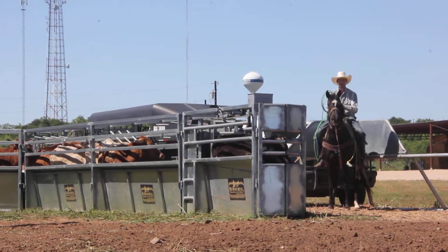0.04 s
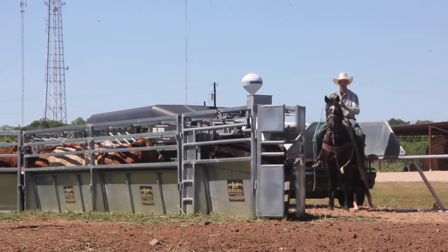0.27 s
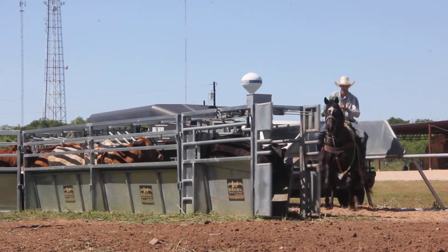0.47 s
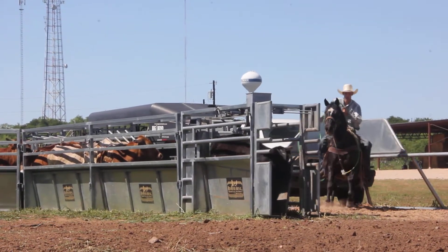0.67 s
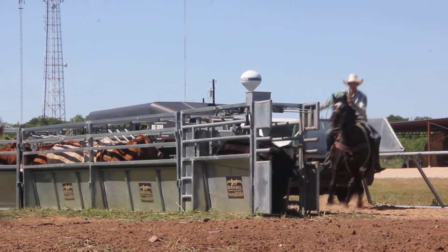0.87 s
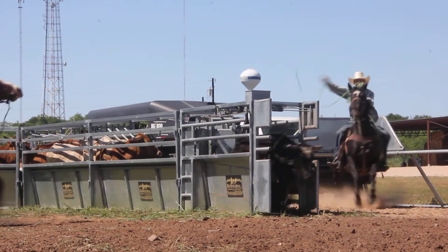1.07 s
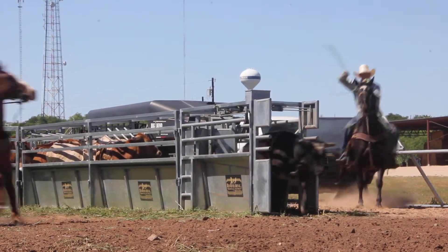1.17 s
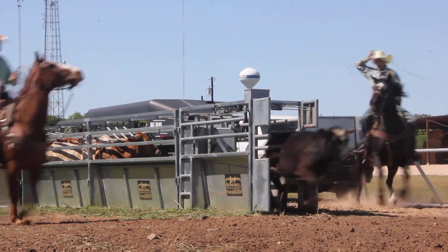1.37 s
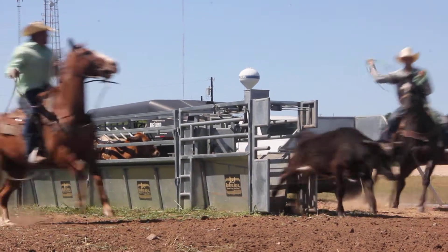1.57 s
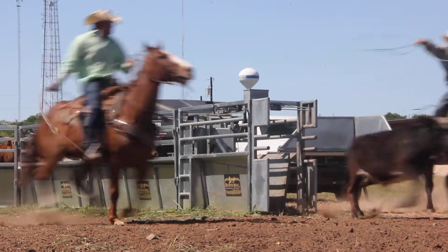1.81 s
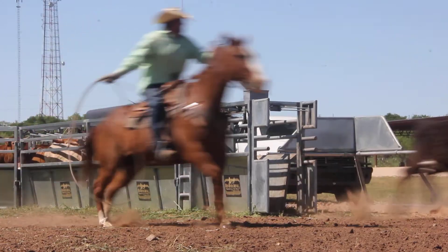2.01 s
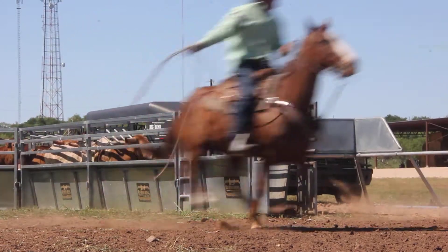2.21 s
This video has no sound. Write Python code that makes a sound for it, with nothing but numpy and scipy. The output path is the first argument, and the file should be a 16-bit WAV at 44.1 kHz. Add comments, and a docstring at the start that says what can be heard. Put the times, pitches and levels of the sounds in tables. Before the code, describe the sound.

A steel cattle gate squeals and clangs open, then bars rattle and hooves thud on dirt.

```python
"""A steel cattle chute opens in an outdoor dirt arena. The latch snaps, the dry hinges stick and slip,
squealing from one note to the next, and the gates crash against their stops and set the frame ringing.
A steer barges out, rattling the bars and thumping the panels, while horses gallop off, kicking up grit.
A short swish passes near the end, and the pens stir quietly behind it all."""
import sys
import numpy as np
from scipy import signal
from scipy.fft import rfft, irfft
from scipy.io import wavfile

SR = 44100
rng = np.random.default_rng(int(sys.argv[2]) if len(sys.argv) > 2 else 0)


def persist_wave(psi):
    """Save psi, clipped to +-1, as 16-bit WAV."""
    counts = np.round(np.clip(psi, -1, 1) * 32767).astype(np.int16)
    wavfile.write(sys.argv[1], SR, np.atleast_2d(counts).T)


N = 99225
T = np.arange(N) / SR

# Deep notes of the chute's panels: pitch_hz, level_db, fade_s (time to fall by 60 dB)
PANEL_NOTES = [(142.3, -7, 0.3), (189.4, -10.5, 0.75), (225.6, -3, 0.97), (245.3, -2.5, 1),
               (281, 1.5, 0.74), (314.7, -2, 0.38)]


def from_db(db):
    """Turn decibels into a number to multiply by."""
    return 10 ** (np.asarray(db) / 20)


def rms_one(x):
    """Scale a sound so its average power is 1."""
    return x / np.sqrt(np.mean(x ** 2) + 1e-20)


def energy_one(x):
    """Scale a sound so its total energy is 1."""
    return x / np.sqrt(np.sum(x ** 2) + 1e-20)


def loudness(points):
    """A volume curve through rows of time_s, level_db."""
    return from_db(np.interp(T, *np.transpose(points)))


def at_pitch(points, hz):
    """Read between a table's rows, giving each octave equal room."""
    pitches, values = np.transpose(points)
    return np.interp(np.log(hz), np.log(pitches), values)


def noise(tone):
    """Noise shaped by rows of pitch_hz, level_db, dropping steeply past both ends."""
    hz = np.maximum(np.fft.rfftfreq(N, 1 / SR), 1)
    edges = np.minimum(1, np.minimum(hz / tone[0][0], tone[-1][0] / hz)) ** 4
    gain = from_db(at_pitch(tone, hz)) * edges
    return rms_one(irfft(rfft(rng.standard_normal(N)) * gain, N))


def wander(rate_hz):
    """A smooth random wobble, about 1 in size."""
    r = np.exp(-2 * np.pi * rate_hz / SR)
    return rms_one(signal.lfilter([1], [1, -2 * r, r * r], rng.standard_normal(2 * N))[N:])


def fade(fade_s, t=T):
    """Die away by 60 dB every fade_s seconds."""
    return np.exp(-np.log(1000) * t / fade_s)


def clicks(per_s, spread_db):
    """Tiny taps of uneven size at random times."""
    sizes = from_db(spread_db * np.minimum(rng.exponential(1, N), 4)) * rng.choice([-1, 1], N)
    return rms_one(sizes * (rng.random(N) < per_s / SR))


def strike(force, body):
    """Every tap in the force sets off the body's own sound."""
    return signal.fftconvolve(force, body)[:N]


def ring(notes):
    """A struck object rings with several fading notes at once."""
    return energy_one(sum(from_db(db) * fade(fade_s) * np.sin(2 * np.pi * hz * T) * rng.choice([-1, 1])
                          for hz, db, fade_s in notes))


def blow(start_s, db, body):
    """Place one hit in time; its level counts the energy as if spread over 30 ms."""
    delayed = np.concatenate([np.zeros(int(start_s * SR)), body])[:N]
    return from_db(db) * np.sqrt(.03 * SR) * delayed


def pens():
    """The stir of the pens is a soft, slightly wavering noise."""
    # Tone of the stir: pitch_hz, level_db
    stir_tone = [(30, -21), (140, 3), (300, -7), (700, -19.5), (1300, -9), (2600, -6), (4500, -13.5),
                 (7000, -30.5), (15500, -47)]
    return from_db(-40.5 + wander(10)) * noise(stir_tone)


def knocks():
    """Two short, dry knocks, each a burst of noise."""
    # When they land: start_s, level_db
    hits = [(.012, -40), (2.218, -39.5)]
    # Tone of a knock: pitch_hz, level_db
    knock_tone = [(900, -4), (1500, 10), (5000, -36)]
    return sum(blow(start_s, db, energy_one(noise(knock_tone) * fade(0.016))) for start_s, db in hits)


def hooves():
    """Shuffling and galloping hooves patter on the dirt and kick up grit."""
    # How hard the hooves trample: time_s, level_db
    trampling = [(0, -44), (.24, -33.5), (.36, -53), (.6, -40), (1.05, -40), (1.2, -28.5), (1.4, -30),
                 (1.47, -27.5), (1.7, -31.5), (1.85, -34.5), (2.05, -37), (2.25, -37)]
    # Dull tone of a step: pitch_hz, level_db
    step_tone = [(45, -35), (80, -16), (150, -3.5), (280, -4.5), (380, -13), (600, -10.5), (800, -19),
                 (1200, -11.5), (2000, -21)]
    # How much grit flies: time_s, level_db
    spray = [(0, -65), (1.15, -49), (1.38, -57), (1.44, -35.5), (1.56, -32.5), (1.75, -64), (1.9, -45.5),
             (2.25, -48)]
    # Bright tone of a grain: pitch_hz, level_db
    grain_tone = [(3000, 9), (7000, -7.5), (10500, -2), (13000, -17), (16000, -21)]
    steps = sum(strike(clicks(140, spread_db=1.5), noise(step_tone) * fade(0.14)) for _ in range(6))
    grit = sum(strike(clicks(700, spread_db=5), noise(grain_tone) * fade(0.013)) for _ in range(4))
    return from_db(-1) * loudness(trampling) * rms_one(steps) + loudness(spray) * rms_one(grit)


def hinge_squeals():
    """Sticking and slipping, the hinges catch on one of their natural notes after another."""
    # Squeals: start_s, end_s, pitch_hz, glide_hz_per_s, level_db, roughness (0 to 1)
    squeals = [(.08, .092, 4400, -5000, -44, .4), (.173, .184, 4400, -6000, -31, .4),
               (.255, .295, 1630, 0, -33, .1), (.25, .268, 2632, 500, -21, .5),
               (.29, .36, 2635, 0, -36, .7), (.205, .365, 3210, -650, -24, .55),
               (.266, .338, 3537, 0, -15, .22), (.25, .39, 3612, 0, -27, .7), (.27, .37, 3848, 0, -25, .3),
               (.24, .33, 6490, 0, -31, .6), (.272, .32, 7235, 0, -30, .5), (.375, .43, 7715, 0, -34, .45),
               (.352, .425, 3864, 0, -16, .25), (.445, .515, 3864, 0, -16.5, .2),
               (.53, .568, 3868, 0, -21, .25), (.39, .43, 4078, 0, -24, .4), (.42, .465, 8446, 0, -34, .3),
               (.50, .565, 3560, 0, -27, .4), (.44, .462, 4975, 0, -18.5, .27),
               (.484, .502, 4980, 0, -19, .27), (.54, .57, 4990, 0, -18, .3), (.59, .612, 4995, 0, -25, .3)]
    boost_db, waver_hz = 3, 24
    out = 0
    for start, end, hz, glide, db, roughness in squeals:
        rise = np.clip((T - start) / (.75 * (end - start)) + .5, 0, 1)
        swell = rise * fade(.085, np.maximum(T - end, 0))
        slide = glide * (np.clip(T, start, end) - (start + end) / 2)
        pitch = hz + slide + waver_hz * roughness * wander(23.3)
        phase = 2 * np.pi * np.cumsum(pitch) / SR
        # The note itself, then two quieter, rougher overtones.
        for multiple, part_db in enumerate((0, -24, -31), 1):
            rough = np.clip(roughness * multiple ** 2, 0, 1)
            flutter = np.sqrt(2 * (1 - rough ** 2)) + rough * (wander(70) + 1j * wander(70))
            note = np.real(flutter * np.exp(1j * multiple * phase))
            out = out + from_db(boost_db + db + part_db) * swell * note
    return out


def hinge_scrape():
    """Dry hinges grind; their uneven slips quicken as the gates gather speed, and ring in the steel."""
    # How hard the hinges rub: time_s, level_db
    friction = [(.16, -77), (.175, -43), (.21, -32.5), (.26, -22.5), (.34, -22.5), (.42, -21.5), (.5, -25),
                (.56, -25.5), (.6, -24), (.65, -96)]
    # How often they slip: time_s, rate_hz
    slip_rate = [(.2, 3256), (.27, 3253), (.3, 3566), (.33, 3560), (.37, 3840), (.43, 4067), (.5, 3960),
                 (.57, 3850)]
    # The slipping note and its three overtones: level_db
    slip_levels = (-11, -12.5, -15, -38)
    # Tone of the grinding: pitch_hz, level_db
    grind_tone = [(900, -43), (1500, -25), (2300, -6.5), (3300, 5.5), (4500, -2.5), (6500, -5.5),
                  (8500, -14.5), (11000, -12.5), (15500, -33)]
    slip_hz = np.interp(T, *np.transpose(slip_rate)) * (1 + 0.0295 * wander(256))
    phase = 2 * np.pi * np.cumsum(slip_hz) / SR
    slips = sum(np.sqrt(2) * from_db(db) * np.sin(k * phase) for k, db in enumerate(slip_levels, 1))
    grind = rms_one(strike(clicks(2500, spread_db=3), noise(grind_tone) * fade(0.036)))
    steel_ring = energy_one(rng.standard_normal(N) * fade(0.17))
    rubbing = loudness(friction)
    return from_db(-1) * rubbing * grind + strike(rubbing * slips, steel_ring)


def steel_frame():
    """One tap on the chute: a crack, a wash of countless close notes, ringing bars, booming panels."""
    # Tone of the frame: pitch_hz, level_db
    steel_tone = [(380, -7), (700, -19.5), (1000, -4.5), (1300, -14.5), (1700, 0.5), (2400, 1), (3600, -2),
                  (4600, -3), (6400, -9.5), (8200, -18), (11600, -15), (15500, -35)]
    # How long the frame rings: pitch_hz, fade_s
    ring_times = [(400, 0.8), (2000, 0.78), (5000, 0.6), (10000, 0.6), (15000, 0.42)]
    # Strongest notes of the bars: pitch_hz, level_db, fade_s
    bar_notes = [(594.5, -12.5, 0.54), (1834.5, 5, 0.43), (2225, -1.5, 1), (2236, -1, 0.99),
                 (2546, -3, 0.75), (3233, 2, 0.46), (4432, -2, 0.43), (5080, -1.5, 0.43), (6293, -9, 0.65),
                 (11600, -11.5, 0.38)]
    wash, edges_hz = 0, np.geomspace(300, 16000, 9)
    for low, high in zip(edges_hz, edges_hz[1:]):
        band_filter = signal.butter(2, [low, high], "band", fs=SR, output="sos")
        band = signal.sosfilt(band_filter, noise(steel_tone))
        wash = wash + band * fade(at_pitch(ring_times, np.sqrt(low * high)))
    crack = energy_one(noise(steel_tone) * fade(0.035))
    return (from_db(-2) * crack + from_db(-4) * energy_one(wash)
            + from_db(-8.5) * ring(bar_notes) + from_db(-17) * ring(PANEL_NOTES))


def change_treble(x, treble_db):
    """Turn the part above 6400 Hz up or down."""
    treble = signal.sosfiltfilt(signal.butter(2, 6400, "high", fs=SR, output="sos"), x)
    return x + (from_db(treble_db) - 1) * treble


def chute_clangs():
    """Each clang is a quick chatter of taps on the frame; loose fittings rattle in between."""
    # Steel hits steel: time_s, level_db, chatter_s, treble_db
    clangs = [(.171, -26, 0.021, -8), (0.217, -23.5, 0.015, -26.5), (0.597, -18, 0.04, -1),
              (.628, -19, 0.015, -0.5), (.643, -14.5, 0.042, 5), (0.661, -22, 0.025, 7),
              (.703, -17.5, 0.01, 6), (0.712, -19.5, 0.028, 9), (1.167, -27.5, 0.053, -4),
              (1.23, -28, 0.017, 7), (1.244, -23, 0.013, -5), (1.378, -23, 0.013, -36),
              (1.436, -25, 0.081, -18), (1.614, -28, 0.012, 3), (1.624, -19.5, 0.008, -10),
              (1.687, -24, 0.0093, 13.5), (1.702, -22.5, .016, -7), (2.123, -31.5, 0.0063, 1.5),
              (2.233, -33, 0.02, -1.5)]
    # How hard the fittings shake: time_s, level_db
    shaking = [(.6, -39), (.76, -26), (.86, -27.5), (1.05, -42.5), (1.16, -38), (1.33, -34), (1.46, -28),
               (1.6, -32.5), (1.78, -26.5), (1.9, -38.5), (2.25, -48)]
    force = change_treble(loudness(shaking) * clicks(220, spread_db=1.5), treble_db=-3.5)
    for time_s, db, chatter_s, treble_db in clangs:
        rise = np.clip((T - time_s) / .003 + .5, 0, 1)
        chatter = clicks(1400, spread_db=1.5) * rise * np.exp(-np.abs(T - time_s) / chatter_s)
        force += change_treble(energy_one(chatter), treble_db) * from_db(db) * np.sqrt(0.029 * SR)
    return strike(force, steel_frame())


def thumps():
    """Hooves and bodies hit the ground and the panels: dull thuds with a boom."""
    # Heavy hits: start_s, level_db
    hits = [(.195, -37.5), (.415, -35.5), (.619, -31), (.698, -31.5), (.79, -35.5), (1.107, -38.5),
            (1.231, -49), (1.315, -36), (1.44, -25), (1.55, -27), (1.61, -27), (1.72, -29.5),
            (2.152, -35.5), (2.183, -39.5)]
    # Tone of a thud: pitch_hz, level_db
    thud_tone = [(40, -28), (80, -14), (160, 5), (280, 4), (420, -2), (800, -20)]
    boom = from_db(-1.5) * ring(PANEL_NOTES)
    return sum(blow(start_s, db, energy_one(noise(thud_tone) * fade(0.29)) + boom) for start_s, db in hits)


def swish():
    """A brief rush of air, likely a swung rope, swells and fades."""
    # Tone of the rushing air: pitch_hz, level_db
    air_tone = [(410, -58), (700, -20), (1130, -2.5), (2020, -1), (2780, -5.5), (2940, -20), (4540, -4.5),
                (7000, -24.5), (11000, -28), (15400, -42)]
    peak_s, width_s = 2.076, 0.0096
    return from_db(-21.5) * noise(air_tone) / (1 + ((T - peak_s) / width_s) ** 2) ** 0.71


def scene():
    """Add the pens, the gate, the animals and the swish into one channel."""
    background = pens()
    gate = hinge_scrape() + hinge_squeals() + chute_clangs()
    animals = thumps() + knocks() + hooves()
    return (background + gate + animals + swish())[None]


def record(dry):
    """Cut the deep bass and the very highest treble."""
    bass_cut = signal.butter(2, 55, "high", fs=SR, output="sos")
    treble_cut = signal.cheby2(16, 70, 16500, fs=SR, output="sos")
    return signal.sosfilt(treble_cut, signal.sosfilt(bass_cut, dry))


dry = scene()
out = record(dry)
persist_wave(out)
```